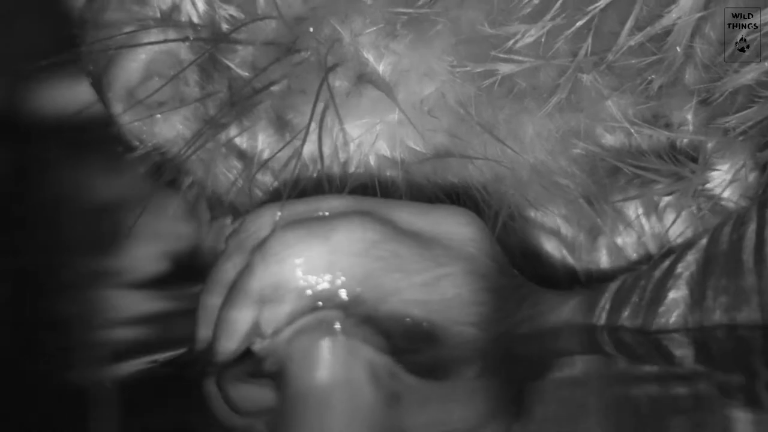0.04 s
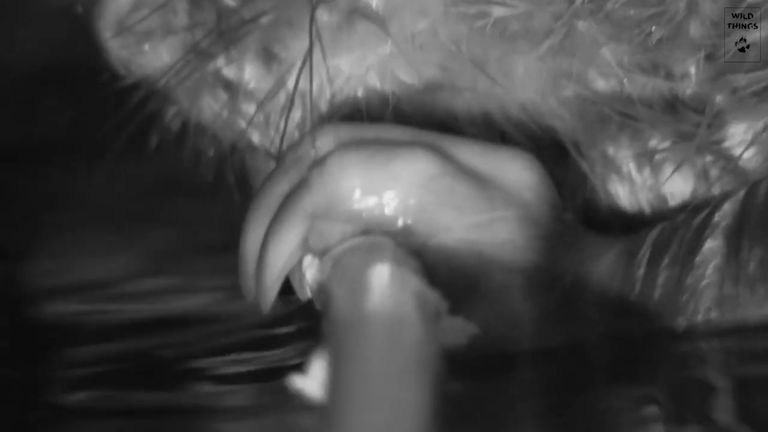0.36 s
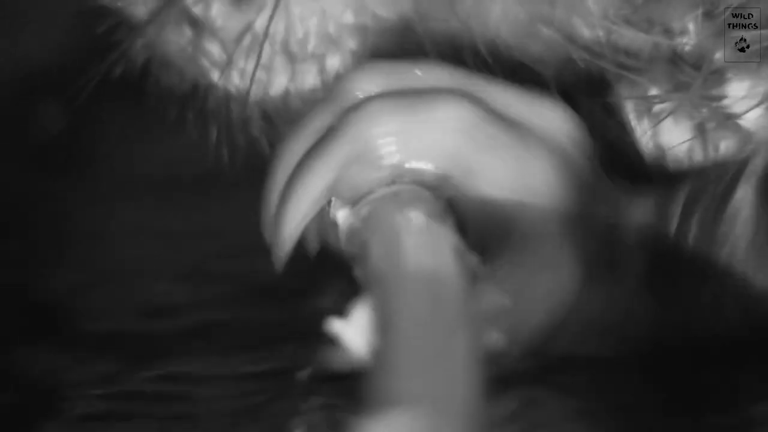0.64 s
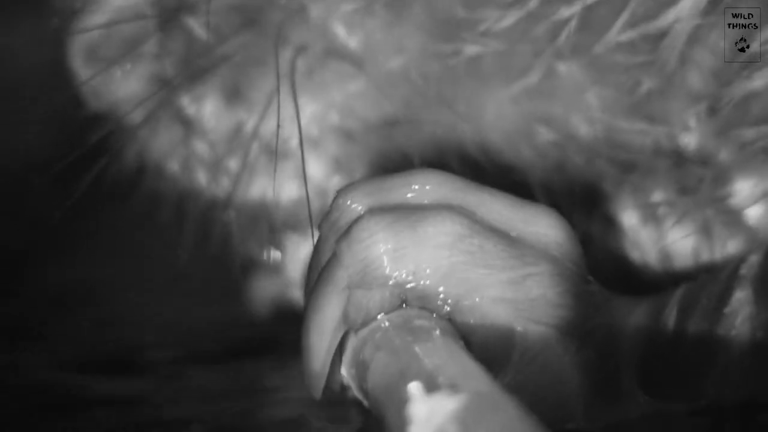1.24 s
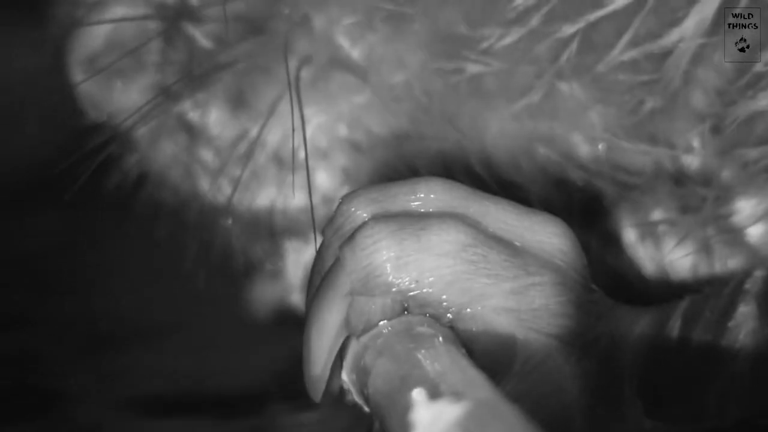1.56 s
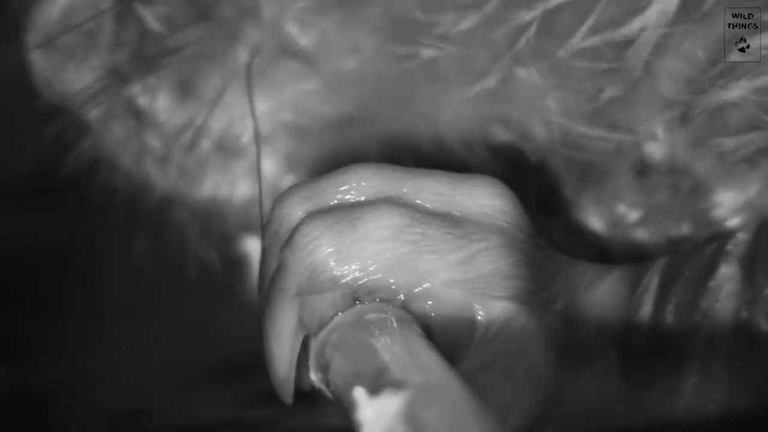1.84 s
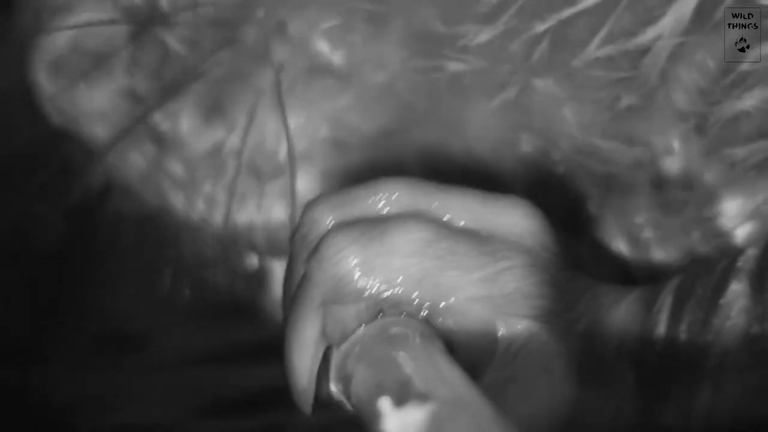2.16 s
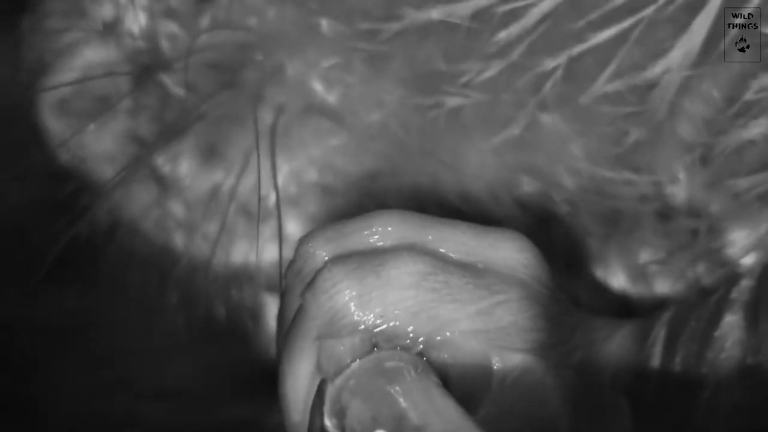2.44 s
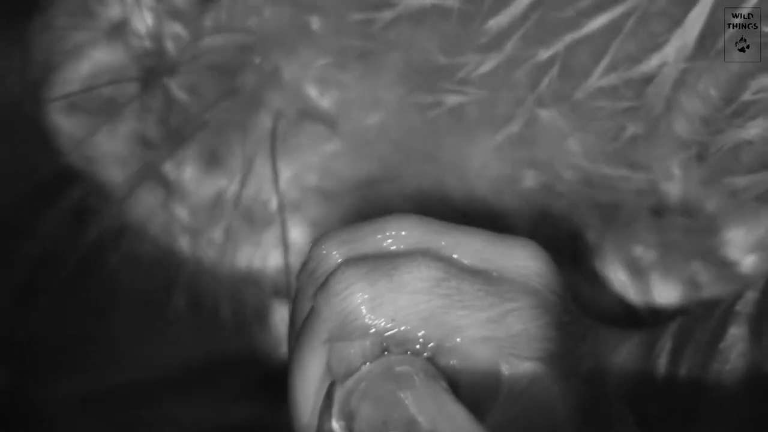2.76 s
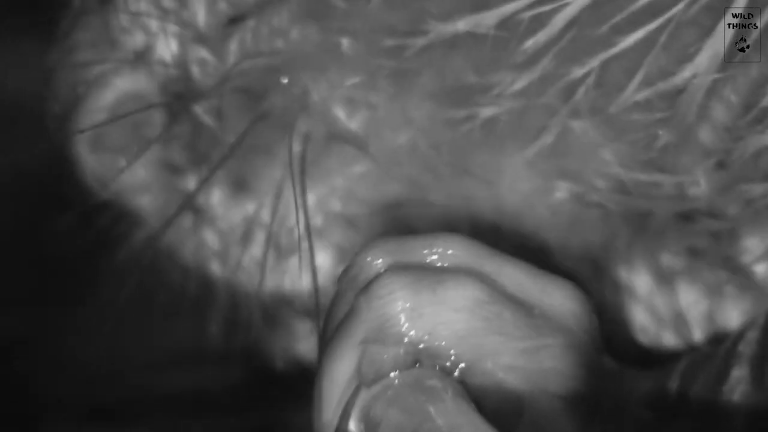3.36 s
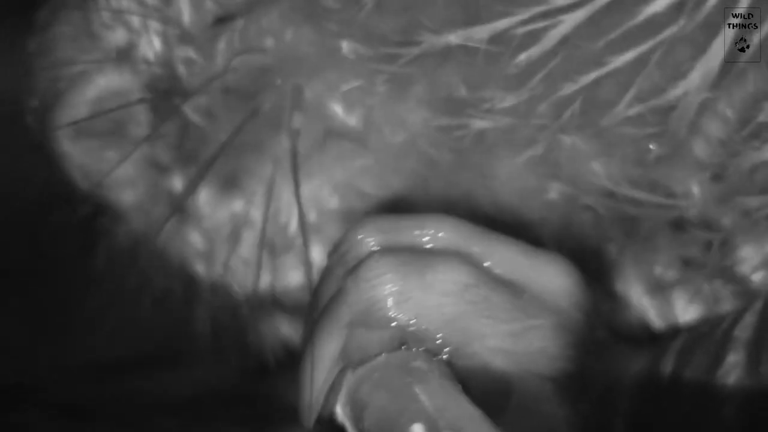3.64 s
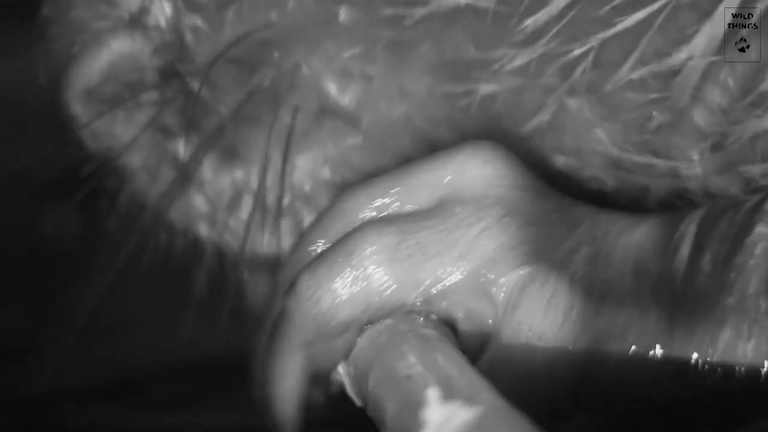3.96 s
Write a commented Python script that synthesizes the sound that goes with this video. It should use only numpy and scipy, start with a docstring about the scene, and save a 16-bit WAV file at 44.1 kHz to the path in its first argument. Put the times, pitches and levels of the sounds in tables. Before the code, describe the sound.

A beaver gnaws a wet stick close to the microphones in a small, quiet den. Scattered wet mouth clicks and little snaps come first, then busier crunching bites with chips cracking off, over a faint steady hiss.

```python
"""A few wet mouth clicks and small snaps of wood come first, then busier bites: a beaver gnaws a wet
stick in its small, quiet den, close to a spaced pair of microphones. The incisors scrape through the
wood, tearing fibres in a dense crackle, and chips snap off, two with a pitched ring. The mouth pops
wetly between bites. Everything rings briefly off the close walls, over a faint hiss."""
import sys
import numpy as np
from scipy import signal
from scipy.fft import rfft, irfft
from scipy.io import wavfile

SR = 44100
rng = np.random.default_rng(int(sys.argv[2]) if len(sys.argv) > 2 else 0)


def bounce(signal):
    """Save signal as a 16-bit WAV file at the path given by the first command-line argument."""
    frames = np.transpose(np.atleast_2d(signal))
    limited = np.clip(frames, -1, 1)
    pcm = np.round(limited * 32767).astype(np.int16)
    wavfile.write(sys.argv[1], SR, pcm)


N = 176400

SCRAPE_GAIN_DB, SCRAPE_ATTACK_S, SCRAPE_RELEASE_S = 6.5, 0.00058, 0.0016
# Light torn fibres sing in the stick's upper resonance: (frequency [Hz], gain [dB])
SCRAPE_COLOUR = [(130, -1), (220, -2.5), (500, -4), (900, 0), (2300, -1), (2900, -1), (3400, 1),
                 (3800, -1.5), (9000, -0.5), (14000, -8)]
# Strokes of the teeth, close to the microphones:
# (time [s], length [s], relative start level [dB], relative end level [dB], body [dB], brightness [dB])
TOOTH_STROKES = [(0.384, 0.023, -45, -44.5, -15, -9.5), (0.721, 0.014, -47, -46, 4, 1.5),
                 (0.776, 0.047, -50.5, -53, 8.5, -1.5), (1.02, 0.012, -32.5, -36.5, -5, 8.5),
                 (1.035, 0.031, -33, -37, -6, 1), (1.057, 0.065, -53.5, -47, -3, 2.5),
                 (1.131, 0.012, -29, -48.5, 5.5, 1.5), (1.761, 0.055, -41, -35.5, -3.5, 4),
                 (1.803, 0.011, -29.5, -26.5, -9, -1), (1.834, 0.005, -31, -29, -2, -13),
                 (2.056, .016, -40, -28.5, 0.5, 5.5), (2.074, 0.032, -41, -36.5, 4.5, -1.5),
                 (2.089, 0.017, -36, -33, -7, 0), (2.113, 0.021, -39, -33, -5.5, -4),
                 (2.258, 0.018, -26.5, -32, 0.5, -1), (2.273, 0.031, -43, -36, 2, 4.5),
                 (2.311, 0.011, -24.5, -30.5, -1, -0.5), (2.324, 0.0149, -48, -27.5, 0.5, -15),
                 (2.703, 0.027, -46.5, -47, 3, 2), (2.736, 0.042, -32, -47, -5.5, 2),
                 (2.91, 0.007, -39, -29.5, -4.5, 1.5), (2.925, 0.023, -35, -33.5, -0.5, 2),
                 (2.958, 0.024, -39.5, -53, -8, 3), (2.989, 0.008, -32, -29, 1.5, -10),
                 (3.093, 0.066, -50.5, -39, -3, -3), (3.275, 0.031, -51, -41.5, -1.5, 4.5),
                 (3.308, 0.036, -34, -32.5, -1, 3), (3.356, 0.019, -50, -34.5, 9, 0),
                 (3.499, 0.027, -31.5, -32.5, -6.5, 0.5), (3.556, 0.019, -28.5, -33.5, 0.5, -10),
                 (3.673, 0.0058, -44, -37, 5, 4.5), (3.684, 0.04, -31, -34, -5.5, 2),
                 (3.788, 0.13, -51.5, -49, -1.5, -1.5), (3.899, 0.02, -43, -34, -1, 3.5),
                 (3.922, 0.031, -41.5, -46, -3, 0.5), (3.959, 0.007, -38, -34, -7, -8)]

def scrapes():
    """Each stroke of the incisors tears a run of fibres, swelling or fading, and stops short."""
    out, t = np.zeros((2, N)), event_time()
    for start, length, start_db, end_db, body_db, bright_db in TOOTH_STROKES:
        attack = 1 - np.exp(-t / SCRAPE_ATTACK_S)
        release = np.exp(-np.maximum(t - length, 0) / SCRAPE_RELEASE_S)
        level_db = np.interp(t, [0, length], [start_db, end_db]) + SCRAPE_GAIN_DB
        force = from_db(level_db) * attack * release
        tearing = fibres(force) * np.linalg.norm(force)
        add(out, start, den(stick(tearing, body_db, bright_db, SCRAPE_COLOUR)))
    return out


SNAP_GAIN_DB = 30
# Clean breaks shake the whole stick and are crisper at the very top: (frequency [Hz], gain [dB])
SNAP_COLOUR = [(130, 0), (220, 2.5), (600, 2), (1500, 0), (2300, 1), (3400, 1), (9000, 0.5), (14000, 2)]
# Chips breaking off at close range: (time [s], relative level [dB], body [dB], brightness [dB])
CHIP_BREAKS = [(0.124, -46, 8, -1), (.673, -45, 1, 6.5), (.812, -41.5, -17, -8), (1.015, -37.5, -6, -9),
               (1.119, -39.5, -10, 3), (1.376, -68.5, -6, 24.5), (1.747, -39, -7, -2),
               (1.837, -35.5, -3, -0.5), (2.052, -40, 6.5, 0), (2.109, -35.5, -12, 11),
               (2.338, -33, -9, 1.5), (2.736, -26.5, -11, -2), (2.749, -31, -10, -3), (2.981, -30, 4, -2.5),
               (3.158, -36.5, 5, 6), (3.164, -26.5, 2, -10.5), (3.173, -33.5, 0.5, -29),
               (3.375, -50, -4, 10), (3.531, -36, -4, -7), (3.5344, -24, -10, 4), (3.567, -39.5, -7, 6.5),
               (3.73, -25, -16, -11), (3.7348, -18, -3.5, -5), (3.746, -34.5, 8.5, -3),
               (3.809, -54, -4, 12.5), (3.856, -54, -1, 11), (3.961, -41, -3, 5.5)]

def snaps():
    """Chips give way, each in one splintering crack."""
    out = np.zeros((2, N))
    for start, level_db, body_db, bright_db in CHIP_BREAKS:
        fracture = from_db(level_db + SNAP_GAIN_DB) * crack(spray_s=0.003, spray_gain=1.37)
        add(out, start, den(stick(fracture, body_db, bright_db, SNAP_COLOUR)))
    return out


def fibres(envelope, breaks_per_s=5000, spread_db=3):
    """Fibres break at random, most small and a few large; energy one."""
    n = len(envelope)
    breaks = rng.random(n) < breaks_per_s / SR
    sizes = from_db(spread_db * np.minimum(rng.exponential(1, n), 4))
    signs = rng.choice([-1, 1], n)
    return unit_energy(breaks * sizes * signs * envelope)


def crack(spray_s, spray_gain):
    """One sharp break with a quick spray of smaller ones; energy one."""
    t = event_time()
    impulse = t == 0
    return unit_energy(impulse + spray_gain * fibres(np.exp(-t / spray_s)))


BODY_LOW_HZ, BODY_HIGH_HZ, BRIGHT_ABOVE_HZ = 180, 1320, 3870
# Spectrum of breaking wood, heard close up: (frequency [Hz], gain [dB])
WOOD_SPECTRUM = [(40, -34), (80, -32.5), (130, -12.5), (175, -25.5), (300, -13), (400, -6.5), (500, -5),
                 (700, 2), (950, 1), (1500, -3), (2100, -2), (2900, 2), (3700, -1.5), (5000, -0.5),
                 (7000, -4.5), (9000, -8.5), (12000, -18.5), (16000, -32.5)]
# Resonances of the stick and the hollow around it: (frequency [Hz], width [Hz], lift [dB])
STICK_MODES = [(214, 32, 10), (606, 54, 4), (975.4, 25, 8.5), (1186, 78, 7), (2082, 55, 6.5),
               (2338, 170, 8), (3342, 210, 7.5), (3840, 64, 4), (4560, 96, 2.5), (5000, 59, -0.5),
               (5250, 130, -0.5), (5970, 200, 0.5), (6210, 63, 1)]

def stick(fracture, body_db, bright_db, tone):
    """Every fracture rings in the same resonances; a deep cut has more body, a shallow one more treble."""
    def gain_db(hz):
        modes = sum(lift / (1 + (2 * (hz - centre) / width) ** 2) for centre, width, lift in STICK_MODES)
        body = body_db / (1 + (hz / BODY_HIGH_HZ) ** 6 + (BODY_LOW_HZ / hz) ** 4)
        bright = bright_db / (1 + (BRIGHT_ABOVE_HZ / hz) ** 6)
        return at_hz(WOOD_SPECTRUM, hz) + at_hz(tone, hz) + modes + body + bright
    return colour(fracture, gain_db)


CLICK_GAIN_DB = 23.5
# Mouth plips (narrow) and smacks (wide) near the microphones; ringing wood at 2.337 s and 3.163 s:
# (time [s], relative level [dB], pitch [Hz], width [Hz])
PITCHED_CLICKS = [(0.085, -47, 2330, 2210), (.126, -33.5, 2470, 650), (.347, -42.5, 2540, 3290),
                  (.475, -37.5, 2320, 600), (.886, -41.5, 1750, 2330), (1.719, -39.5, 2600, 1500),
                  (1.915, -35.5, 2040, 646), (1.933, -34, 1100, 448), (2.031, -39.5, 2670, 1500),
                  (2.204, -37.5, 1870, 1990), (2.217, -39, 1280, 1100), (2.25, -32, 890, 1310),
                  (2.337, -30, 2400, 400), (2.647, -38.5, 1400, 1570), (2.829, -44, 1000, 2200),
                  (2.85, -40.5, 1800, 2220), (3.063, -40.5, 2000, 3500), (3.07, -37, 2280, 1170),
                  (3.163, -19, 2360, 800), (3.235, -40, 2020, 2000), (3.444, -41.5, 1080, 1100),
                  (3.639, -34.5, 1980, 1700), (3.66, -41, 2190, 1300), (3.842, -45, 1300, 1500),
                  (3.872, -45, 2250, 1180), (3.97, -33, 613, 298)]

def pitched_clicks():
    """Short pitched clicks: wet mouth pops, and the 2.4 kHz ring of two wood snaps."""
    out = np.zeros((2, N))
    for start, level_db, pitch_hz, width_hz in PITCHED_CLICKS:
        resonance = signal.iirpeak(pitch_hz, pitch_hz / width_hz, fs=SR)
        pop = crack(spray_s=0.00064, spray_gain=0.34) + 1e-18
        ring = signal.lfilter(*resonance, signal.lfilter(*resonance, pop))
        add(out, start, den(from_db(level_db + CLICK_GAIN_DB) * unit_energy(ring)))
    return out


ECHO_DB, DIRECT_LEFT_DB, DIRECT_RIGHT_DB, LEFT_DELAY_S = -1, -7.5, -4, 0.000936
# Width of the den's echo across the spaced pair: (frequency [Hz], side minus mid [dB])
ECHO_WIDTH = [(130, -11), (230, -11), (400, 6.5), (850, 8.5), (1300, 3), (2250, -3), (3100, 7), (8000, 1.5)]

def den(source):
    """The direct sound reaches the right microphone first; the echo surrounds both."""
    mid = colour(wall_echo(), lambda hz: -10 * np.log10(1 + from_db(at_hz(ECHO_WIDTH, hz)) ** 2))
    side = colour(wall_echo(), lambda hz: -10 * np.log10(1 + from_db(-at_hz(ECHO_WIDTH, hz)) ** 2))
    paths = from_db(ECHO_DB) * np.array([mid + side, mid - side])
    paths[0, int(LEFT_DELAY_S * SR)] += from_db(DIRECT_LEFT_DB)
    paths[1, 0] += from_db(DIRECT_RIGHT_DB)
    return signal.fftconvolve(source[None], paths, axes=1)


def wall_echo(t60_s=0.055, bass_t60_s=0.067, bass_below_hz=1500, build_s=0.00025):
    """Dense reflections from close walls, new with each move of the head; the bass lasts longer."""
    t = event_time()
    noise, bass_noise = rng.standard_normal((2, len(t)))
    bass = signal.sosfilt(signal.butter(2, bass_below_hz, fs=SR, output="sos"), bass_noise)
    echo = noise * from_db(-60 * t / t60_s) + bass * from_db(-60 * t / bass_t60_s)
    return unit_energy(echo * (1 - np.exp(-t / build_s)))


HISS_MID_RMS_DB, HISS_SIDE_RMS_DB = -52, -49.5
# Hiss common to both microphones: (frequency [Hz], relative level [dB])
HISS_MID_SPECTRUM = [(15, -73), (25, -20), (145, -15.5), (180, -18.5), (256, -8.5), (293, -12.5), (326, -4),
                     (363, -13.5), (405, -8), (516, -12.5), (677, -0.5), (818, -9), (962, -0.5), (1190, -4),
                     (1700, -2.5), (2160, -3.5), (2760, -4.5), (3080, -9), (16000, -27.5)]
# Hiss in opposite phase across the pair: (frequency [Hz], relative level [dB])
HISS_SIDE_SPECTRUM = [(15, -59), (25, -22), (157, -27), (263, -14), (293, -18), (335, -11.5), (489, -4.5),
                      (531, -14), (624, -10), (677, 3), (796, -14), (988, 1), (1070, -1.5), (1400, -7),
                      (1840, -10), (2840, -13.5), (3720, -17.5), (4030, -16), (16000, -36.5)]

def hiss():
    """Steady faint hiss with an uneven spectrum, fading toward the treble."""
    def shaped_noise(spectrum, rms_db):
        noise = colour(rng.standard_normal(N), lambda hz: at_hz(spectrum, hz))
        return from_db(rms_db) * np.sqrt(N) * unit_energy(noise)
    mid = shaped_noise(HISS_MID_SPECTRUM, HISS_MID_RMS_DB)
    side = shaped_noise(HISS_SIDE_SPECTRUM, HISS_SIDE_RMS_DB)
    return np.array([mid + side, mid - side])


def from_db(db):
    """Decibels to gain."""
    return 10 ** (np.asarray(db) / 20)


def unit_energy(x):
    """Scale to an energy of one."""
    return x / np.sqrt(np.sum(x ** 2) + 1e-20)


def at_hz(spectrum, hz):
    """Read a spectrum on a log-frequency axis."""
    frequencies, values = np.transpose(spectrum)
    return np.interp(np.log(hz), np.log(frequencies), values)


def colour(x, gain_db, size=4096):
    """Minimum-phase filter whose gain in dB is gain_db(Hz)."""
    hz = np.maximum(np.fft.rfftfreq(size, 1 / SR), 1)
    cepstrum = irfft(np.log(from_db(gain_db(hz))))
    cepstrum[1:size // 2] *= 2  # folding onto positive time makes the filter causal
    cepstrum[size // 2 + 1:] = 0
    response = irfft(np.exp(rfft(cepstrum)))
    return signal.fftconvolve(x, response)[:len(x)]


def add(out, start_s, sound):
    """Mix a stereo sound in at a time."""
    i = int(start_s * SR)
    out[:, i:i + sound.shape[1]] += sound[:, :N - i]


def event_time(samples=6000):
    """Time axis of one short event, in seconds."""
    return np.arange(samples) / SR


# Balance of the beaver's sounds across the pair: (frequency [Hz], left minus right [dB])
MIC_BALANCE = [(130, -7.5), (500, -0.5), (750, 2.5), (1400, 2), (2300, 1), (4000, 0), (6300, -3), (9000, 4),
               (13000, 0.5)]

def scene():
    """Bites and clicks, coloured a little differently at each microphone, over the hiss."""
    left, right = scrapes() + snaps() + pitched_clicks()
    left = colour(left, lambda hz: at_hz(MIC_BALANCE, hz) / 2)
    right = colour(right, lambda hz: -at_hz(MIC_BALANCE, hz) / 2)
    return np.array([left, right]) + hiss()


CUTOFF_HZ = 15700

def record(dry):
    """The recorder cuts the top treble steeply."""
    return signal.sosfilt(signal.ellip(10, .1, 70, CUTOFF_HZ, fs=SR, output="sos"), dry)


dry = scene()
out = record(dry)
bounce(out)
```